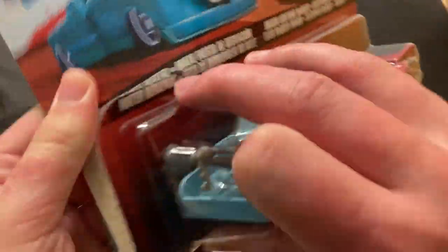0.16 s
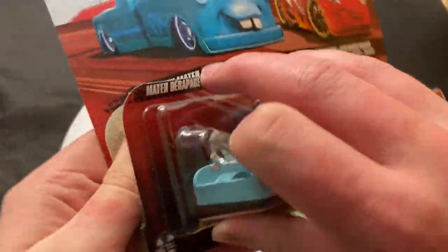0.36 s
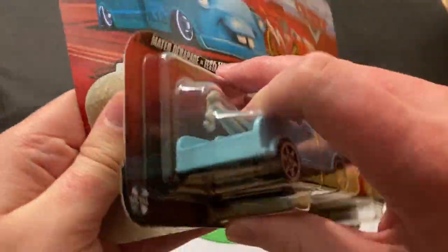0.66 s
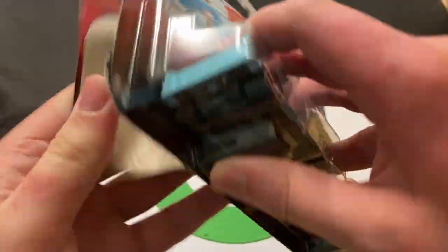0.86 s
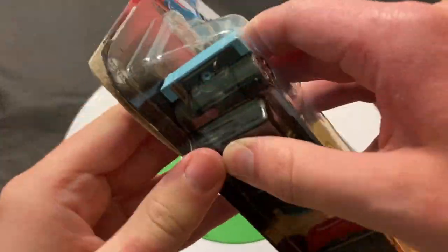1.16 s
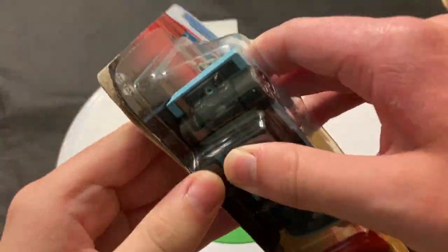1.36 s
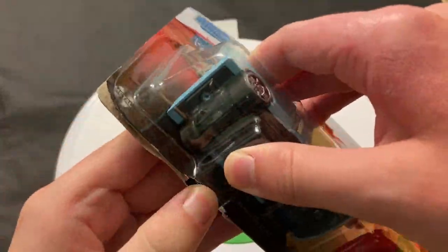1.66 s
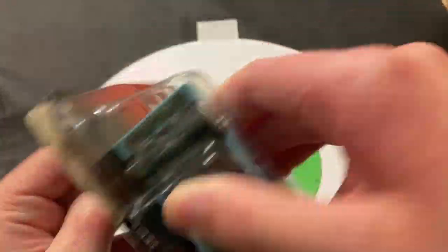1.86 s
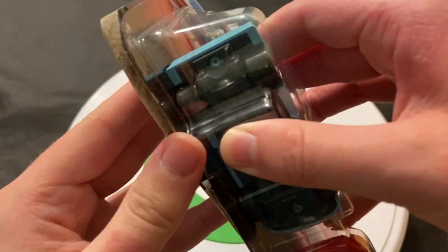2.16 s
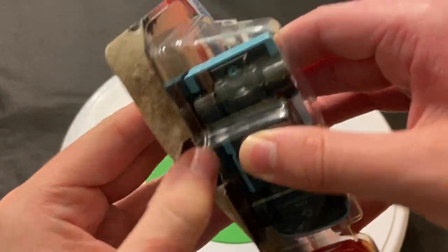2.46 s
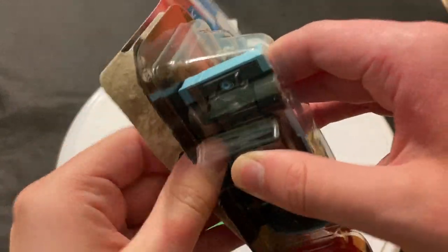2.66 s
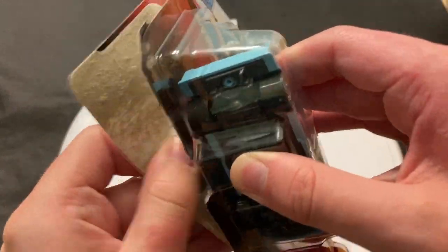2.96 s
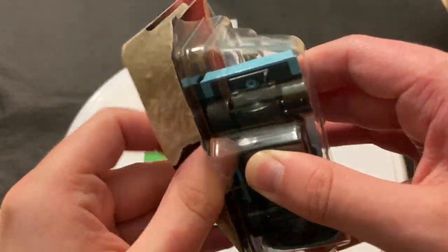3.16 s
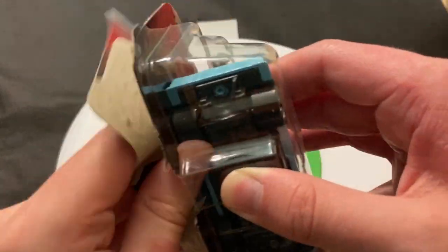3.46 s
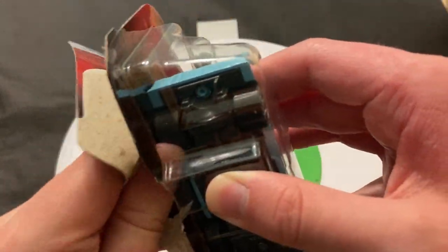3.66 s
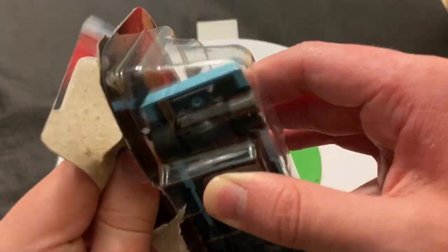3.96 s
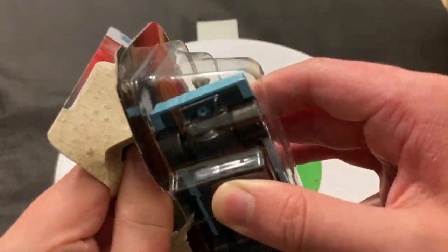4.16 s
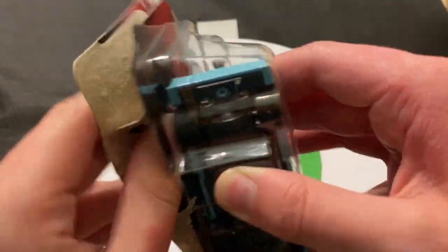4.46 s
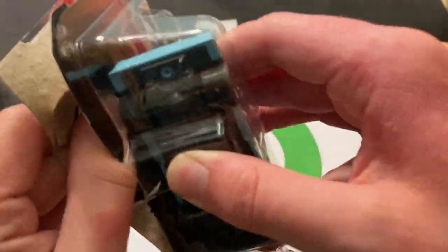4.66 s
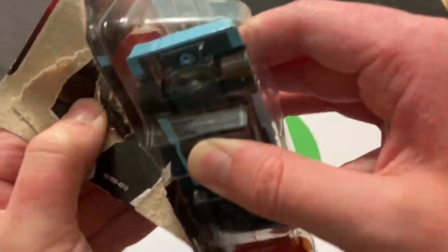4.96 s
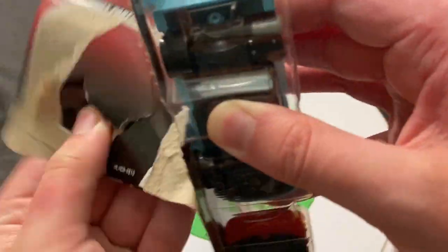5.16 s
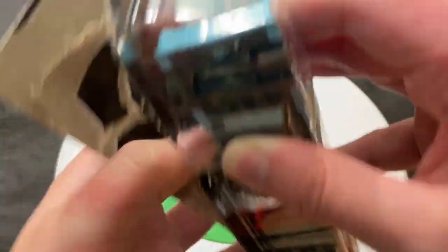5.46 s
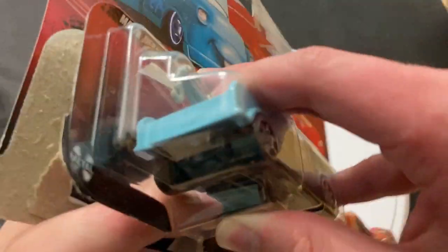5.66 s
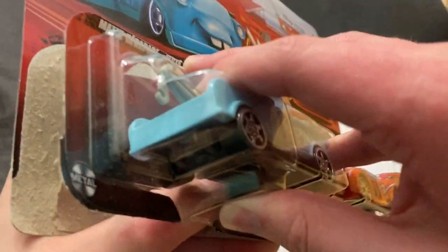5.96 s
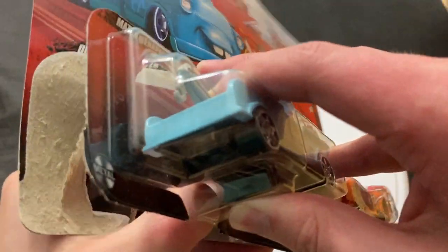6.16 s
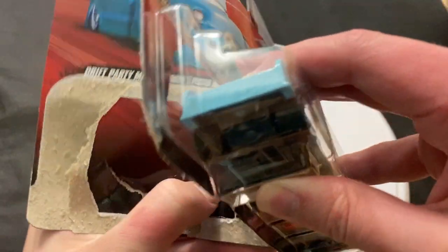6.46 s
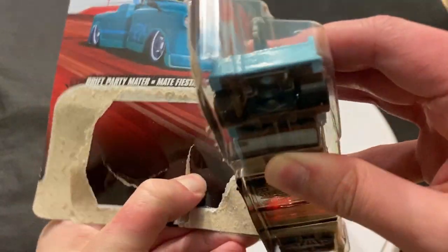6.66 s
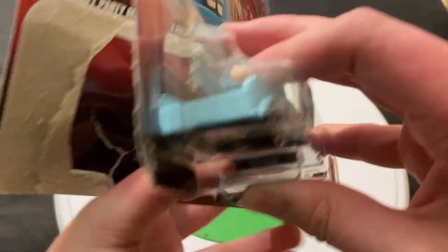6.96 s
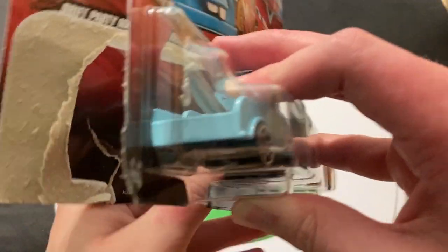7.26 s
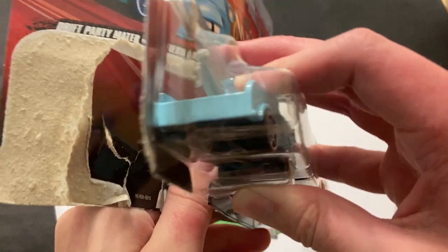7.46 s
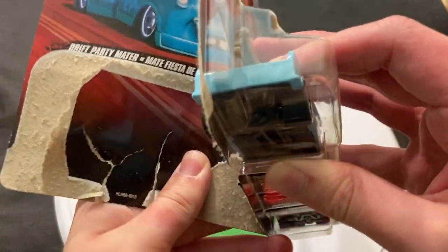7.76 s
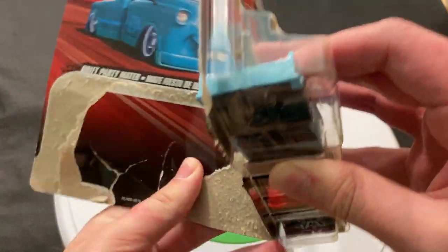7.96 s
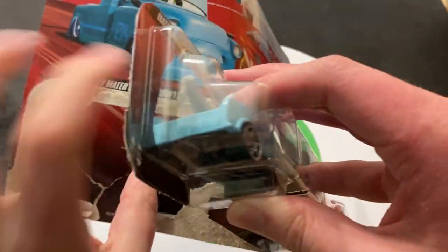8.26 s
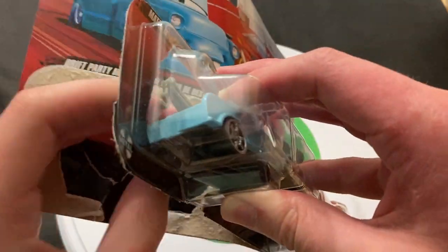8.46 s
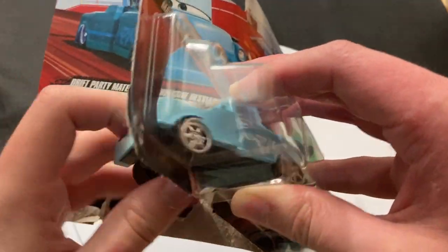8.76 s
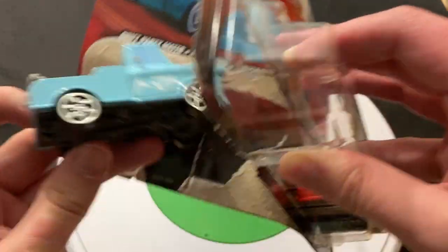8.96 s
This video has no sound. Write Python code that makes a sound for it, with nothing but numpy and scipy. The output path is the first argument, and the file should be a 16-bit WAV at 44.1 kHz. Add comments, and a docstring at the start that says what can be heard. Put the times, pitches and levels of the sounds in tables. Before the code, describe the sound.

Very close to the microphone in a small quiet room, hands open a toy car's blister pack. Thin plastic crackles and card rips in short uneven jerks, with brief creaks early on. Loud hollow pops burst out near two, four and five seconds. Afterwards the handling gets lighter, with scattered crackles, fibre ticks, soft thuds and finally the toy tapping inside the plastic.

```python
"""Hands tear the cardboard backing off a toy car's blister pack, close to the microphone in a small room.
Ripping fibres and sliding fingers are random grains that drive card, plastic and torn edge; the thin blister
crackles and snaps in noise bursts at the pitch of each crease, and three times it buckles with a sagging hollow pop.
The card thuds, the toy taps inside, the strained plastic creaks and gives narrow tones through decaying resonances.
A wavering low hum, a rumble and a faint hiss of filtered noise lie underneath."""
import sys
import numpy as np
from scipy import signal
from scipy.fft import rfft, irfft
from scipy.io import wavfile
from scipy.ndimage import uniform_filter1d

SR = 44100
rng = np.random.default_rng(int(sys.argv[2]) if len(sys.argv) > 2 else 0)


def put_to_file(sound):
    """Save the sound as 16-bit audio at rate SR, in the file named by the first command-line argument."""
    columns = np.atleast_2d(sound).T  # one column per channel
    safe = np.clip(columns, -1, 1)
    whole_steps = np.round(safe * 32767)
    wavfile.write(sys.argv[1], SR, whole_steps.astype(np.int16))


N = 400869
TIME = np.arange(N) / SR


def from_db(db):
    """Decibels to gain."""
    return np.exp(np.asarray(db) * (np.log(10) / 20))


def rms_one(x):
    """Scale to an rms of 1."""
    return x / np.sqrt(np.mean(x ** 2) + 1e-20)


def in_time(rows):
    """Each column of a curve, at every sample."""
    s, *columns = np.transpose(rows)
    return [np.interp(TIME, s, c) for c in columns]


def at_hz(points, hz):
    """Read a table on a log-frequency axis."""
    f, value = np.transpose(points)
    return np.interp(np.log(np.maximum(hz, 1)), np.log(f), value)


def butter(x, hz, kind, order=2):
    """Causal low-, high- or band-pass."""
    sos = signal.butter(order, np.clip(hz, 10, .45 * SR), kind, fs=SR, output="sos")
    return signal.sosfilt(sos, x)


def colour(x, spectrum):
    """Give a signal a spectrum through a causal (minimum-phase) filter; rms 1."""
    size = 8192
    log_gain = np.log(from_db(at_hz(spectrum, np.fft.rfftfreq(size, 1 / SR))))
    # folding the cepstrum onto positive times makes the filter minimum-phase
    cepstrum = irfft(log_gain)
    cepstrum[1:size // 2] *= 2
    cepstrum[size // 2 + 1:] = 0
    impulse = irfft(np.exp(rfft(cepstrum)))
    return rms_one(signal.fftconvolve(x, impulse)[:N])


def drift(rate):
    """Smooth chance with a spread near 1, taking a new value `rate` times a second."""
    values = rng.standard_normal(N // 40)
    return np.interp(TIME * rate, np.arange(len(values)), values)


def add(out, s, sound):
    """Mix a sound in at time s."""
    start = int(np.clip(round(s * SR), 0, N - 1))
    out[start:start + len(sound)] += sound[:N - start]


def ring(x, hz, t60):
    """A two-pole resonator: a unit click sets a decaying sine of height 1 ringing."""
    r, w = from_db(-60 / (t60 * SR)), 2 * np.pi * hz / SR
    return signal.lfilter([0, np.sin(w)], [1, -2 * r * np.cos(w), r * r], x + 1e-18)


def resonate(x, hz, width_hz):
    """One resonance, with a gain of 1 at its top."""
    r = np.exp(-np.pi * width_hz / SR)
    top = np.array([1, 0, -1]) * (1 - r * r) / 2
    return signal.lfilter(top, [1, -2 * r * np.cos(2 * np.pi * hz / SR), r * r], x + 1e-18)


def background(low_hz=60, high_hz=100):
    """A wavering hum and a low handling rumble that rises and falls, under a faint hiss."""
    # the quiet room's air: (frequency [Hz], relative level per Hz [dB])
    air = [(30, -51), (55, 0), (75, 0), (110, 0), (170, -9), (300, -17), (1500, -21), (4000, -34.5),
           (10000, -40), (16000, -46)]
    # low handling rumble: (time [s], level [dB])
    rumble_levels = [(0, -55), (1, -89.5), (5, -66), (6.7, -57), (8.4, -66)]
    # the hum swells for a moment: (time [s], added level [dB])
    hum_swell = [(7.6, -2), (7.85, 17), (8.2, 10), (8.4, 3)]
    hum_hz, hum_db, air_db = 75.6, -67.5, -58.5   # hum level before the swell
    hum_gain = from_db(hum_db + in_time(hum_swell)[0] + 2 * drift(5.0))
    hum = np.sqrt(2) * np.sin(2 * np.pi * hum_hz * TIME) * hum_gain
    low_noise = rms_one(butter(rng.standard_normal(N), [low_hz, high_hz], "band", order=4))
    rumble = from_db(in_time(rumble_levels)[0]) * low_noise
    hiss = from_db(air_db) * colour(rng.standard_normal(N), air)
    return hum + rumble + hiss


def narrow_tones(t60=0.019):
    """Fading noise keeps one mode of the wall sounding."""
    # narrow tones on the plastic: squeaks, and modes left ringing by a snap or pop:
    # (time [s], length [s], level [dB], pitch [Hz])
    tone_table = [(0.04, 0.095, -38.5, 2170), (3.74, 0.45, -56.5, 2560), (4.088, 0.068, -40.5, 4800),
                  (6.9626, 0.012, -30, 3600), (6.966, 0.0082, -30.5, 4870), (8.058, 0.036, -44.5, 895),
                  (8.285, .03, -51.5, 880), (8.913, 0.031, -41.5, 6560), (8.927, 0.097, -47, 3350),
                  (8.95, 0.038, -41, 4820)]
    out = np.zeros(N)
    for s, length, level_db, hz in tone_table:
        fade = np.sqrt(np.linspace(1, 0, int(length * SR)))
        mode = ring(rng.standard_normal(SR // 2)[:len(fade)], hz, t60)
        add(out, s, from_db(level_db) * rms_one(fade * mode))
    return out


def creaks(tick_db=-13, mode_spread_db=5.0, uneven_db=4):
    """The strained blister slips a notch at a time; each slip ticks and plucks the wall's modes."""
    # slips come evenly or, as the strain eases, further apart:
    # (start [s], length [s], first gap [s], growth of each gap [ratio])
    creak_table = [(1.105, .055, .022, 1.0), (1.325, .135, .0173, 1.165), (1.5524, .12, .022, 1.0)]
    # level of a creak's slips before chance lowers each one: (level [dB])
    creak_levels = [-45, -37, -38]
    # what a creak rings with once settled: (frequency [Hz], typical level [dB], t60 [s])
    creak_modes = [(572, -4, 0.047), (880, -6.5, 0.044), (1400, -9.5, 0.0092), (2960, -11.5, 0.00487)]
    # a slip's ring starts higher by this share and sinks as the wall relaxes
    glide, glide_s = 1.48, 0.00097
    out, t = np.zeros(N), TIME[:SR // 10]
    turns = 2 * np.pi * np.cumsum(1 + glide * np.exp(-t / glide_s)) / SR
    for (start, length, gap, growth), peak_db in zip(creak_table, creak_levels):
        delays = np.cumsum(np.r_[0, gap * growth ** np.arange(10)])
        for delay in delays[delays < length]:
            slip = np.zeros(len(t))
            for hz, level_db, t60 in creak_modes:
                mode_db = level_db + mode_spread_db * rng.standard_normal()
                slip += np.sin(hz * turns) * from_db(mode_db - 60 * t / t60)
            slip[0] += from_db(tick_db)
            add(out, start + delay, from_db(peak_db - uneven_db * rng.random()) * slip)
    return out


def taps(t60=0.023, upper_ratio=2.96, upper_db=-6, rattle=0.26, rattle_t60=0.023):
    """A tap rings one patch of wall and a weaker overtone, and rattles against it for a moment."""
    # the toy shifts and taps the blister: (time [s], peak level [dB], pitch of the patch [Hz])
    tap_table = [(3.385, -26, 1200), (6.247, -22, 1400), (8.351, -26, 1100), (8.372, -30.5, 1260),
                 (8.406, -29.5, 1330), (8.53, -22.5, 1520), (8.548, -23.5, 1400), (8.741, -21, 1280),
                 (8.864, -28, 1200)]
    out, t = np.zeros(N), TIME[:SR // 10]
    for (s, peak_db, hz), chatter in zip(tap_table, rng.standard_normal((len(tap_table), len(t)))):
        force = rattle * chatter * from_db(-60 * t / rattle_t60)
        force[0] = 1
        overtone = from_db(upper_db) * ring(force, upper_ratio * hz, t60 / 2)
        tap = ring(force, hz, t60) + overtone
        add(out, s, from_db(peak_db) * tap / np.abs(tap).max())
    return out


def thump(shake, crack=0.43, low_hz=150, high_hz=800, t60=0.045):
    """A jolt and a short shudder of the card; rms 1."""
    push = shake * from_db(-60 * TIME[:len(shake)] / t60)
    push[0] += 2 * crack
    return rms_one(butter(push, [low_hz, high_hz], "band"))


def thuds():
    """Low thuds: each jolt sets the card shuddering in a low band of noise."""
    # low thuds of the card, alone or under a strong snap or pop:
    # (time [s], level as energy spread over 5 ms [dB])
    thud_table = [(0.278, -45.5), (0.398, -37), (0.516, -45), (0.746, -32), (0.8706, -30), (1.8461, -13),
                  (2.021, -30.5), (2.099, -34), (2.708, -38.5), (2.8763, -29.5), (3.231, -33.5),
                  (4.047, -21.5), (5.305, -36.5), (5.5471, -43), (5.9962, -42), (6.197, -33), (6.8, -42),
                  (7.027, -33.5), (7.1301, -33.5), (7.518, -36), (8.8761, -31), (9.0756, -27.5)]
    out, size = np.zeros(N), SR // 6
    unit = np.sqrt(.005 * SR / size)   # rms over the burst to energy over 5 ms
    for (s, level_db), shake in zip(thud_table, rng.standard_normal((len(thud_table), size))):
        add(out, s, unit * from_db(level_db) * thump(shake))
    return out


def buckles(sag=0.12, settle_s=0.0035, rise_s=0.00047, thud_hz=225, thud_db=-17, thud_t60=0.021):
    """The flipped wall swings, its pitch sagging as the tension goes; the whole pack jolts."""
    # a wall of the blister flips over:
    # (time [s], level before the onset's rise [dB], middle of the sagging pitch [Hz], t60 [s])
    buckle_table = [(1.8466, 1, 916, 0.027), (4.033, -15, 880, 0.022), (4.0388, -10, 832, 0.048),
                    (4.9071, -2, 876, 0.042)]
    out, t = np.zeros(N), TIME[:SR // 4]
    for s, peak_db, hz, t60 in buckle_table:
        pitch = hz * (1 + sag * (np.exp(-t / settle_s) - .5))
        swing = np.sin(2 * np.pi * np.cumsum(pitch) / SR) * from_db(-60 * t / t60)
        jolt = np.sin(2 * np.pi * thud_hz * t) * from_db(thud_db - 60 * t / thud_t60)
        add(out, s, from_db(peak_db) * (swing + jolt) * (1 - np.exp(-t / rise_s)))
    return out


def wall_modes(force, hz, draws, spread=0.701, cycles=26):
    """The wall around a crease has a handful of modes scattered about its pitch, dying within some cycles."""
    pitches = np.minimum(hz * np.exp(spread * draws), 14000)
    total = np.zeros(len(force))
    for f, d in zip(pitches, draws):
        mode = rms_one(np.gradient(ring(force, f, cycles / f)))
        total += mode * np.exp(-d * d / 2)   # weaker away from the crease's pitch
    return rms_one(total)


def snaps(crack=2.84, width=1.345, swell=0.0052, top_hz=14000, hard_db=-16, hardness=0.032,
          modes_db=-2.0, split_db=-19, count=5):
    """A crease jumps with one sharp crack, flutters at its own pitch and shakes the card behind it."""
    # the blister snaps at a crease:
    # (time [s], level of the crease's sound as energy spread over 5 ms [dB], pitch [Hz], t60 of the flutter [s])
    snap_table = [(0.003, -25, 3320, 0.092), (0.214, -37.5, 930, 0.054), (0.4418, -33.5, 895, 0.062),
                  (0.62, -30, 5100, 0.068), (0.683, -29, 4500, .04), (0.7106, -28, 1340, 0.076),
                  (0.733, -24.5, 3350, 0.18), (0.747, -32, 1400, 0.027), (0.8715, -30.5, 1550, 0.012),
                  (0.923, -11.5, 4560, 0.0096), (0.9394, -17, 2600, 0.02), (1.8076, -14, 3940, 0.012),
                  (1.8339, -17.5, 5800, 0.034), (1.8347, -18, 1500, 0.078), (1.8462, -16, 1870, 0.021),
                  (2.023, -28, 1060, 0.046), (2.099, -34, 4830, 0.014), (2.582, -30.5, 3050, 0.11),
                  (2.586, -34, 1260, 0.097), (2.707, -27, 1500, 0.028), (2.7716, -33, 1340, 0.053),
                  (2.877, -38, 940, 0.039), (2.949, -18.5, 4280, 0.014), (3.071, -18.5, 3260, 0.024),
                  (3.2075, -24, 1610, 0.018), (3.2315, -36, 2130, 0.056), (3.3346, -30.5, 906, 0.074),
                  (3.375, -33.5, 1170, 0.034), (3.5794, -19, 5700, 0.011), (3.87, -21, 5000, 0.012),
                  (4.038, -8, 1100, 0.1), (4.038, -11.5, 4160, 0.11), (4.0559, -19, 1680, 0.013),
                  (4.2533, -30.5, 5360, 0.038), (4.397, -26.5, 1100, 0.018), (4.847, -28.5, 5100, 0.02),
                  (4.907, -10, 1280, 0.026), (4.9138, -19.5, 4130, 0.035), (4.9376, -20, 1890, 0.14),
                  (4.953, -14, 1290, 0.066), (4.9783, -22.5, 2220, 0.027), (5.5475, -20, 1450, 0.024),
                  (5.612, -31.5, 1120, 0.016), (5.651, -33.5, 4380, 0.012), (5.7498, -30, 2770, 0.02),
                  (5.761, -33, 4530, 0.036), (5.809, -27.5, 2300, 0.01), (5.9942, -31, 953, 0.041),
                  (6.223, -29, 4030, 0.041), (6.2424, -27.5, 1330, 0.029), (6.9656, -30, 3660, 0.037),
                  (7.003, -27, 1800, 0.065), (7.016, -32, 1970, 0.02), (7.026, -30, 900, 0.054),
                  (7.1282, -23, 1410, 0.093), (7.2289, -24.5, 1610, 0.02), (7.303, -29, 2240, 0.019),
                  (7.352, -30, 3060, 0.042), (7.3591, -22, 1460, 0.013), (7.518, -30, 1920, 0.023),
                  (7.5381, -28, 4440, 0.004), (7.9985, -33.5, 2320, 0.011), (8.4324, -31.5, 2970, 0.017),
                  (8.5282, -30.5, 3550, 0.077), (8.7407, -32, 1890, 0.03), (8.8754, -26.5, 1000, 0.13),
                  (9.0768, -22.5, 2550, 0.031)]
    # a snap shakes the card, less so from a small, high crease
    thump_db, thump_db_per_octave, thump_at_hz = -22, -2.5, 1500
    out, t = np.zeros(N), TIME[:SR // 6]
    unit = np.sqrt(.005 * SR / len(t))   # rms over the burst to energy over 5 ms
    scatter = np.linspace(-1, 1, count) + rng.uniform(-0.94, 1, (len(snap_table), count)) / count
    noises = rng.standard_normal((len(snap_table), 2, len(t)))
    band = max(width, 1.1)
    for (s, snap_db, hz, t60), draws, (flutter, shake) in zip(snap_table, scatter, noises):
        # a long crumple takes longer to get going than a short snap
        force = flutter * from_db(-60 * t / t60) * (1 - np.exp(-t / (swell * t60)))
        force[0] += 2 * crack
        crease = butter(force, [hz / band, hz * band], "band", order=1)
        crease = butter(crease, hz / 2.34, "high")
        # harder snaps reach further into the treble
        reach_hz = top_hz * from_db(hardness * min(snap_db - hard_db, 0))
        crease = butter(crease, max(reach_hz, 2 * hz), "low")
        crease = rms_one(crease) + from_db(modes_db) * wall_modes(force, hz, draws)
        # the first instant is bright at any pitch
        crease += from_db(split_db) * rms_one(butter(force, top_hz / 2, "high"))
        card_db = thump_db + thump_db_per_octave * np.log2(hz / thump_at_hz)
        card = from_db(card_db) * thump(shake)
        add(out, s, unit * from_db(snap_db) * (rms_one(crease) + card))
    return out


def ticks(rub_gain, low_hz=1800, high_hz=9000, t60=0.012, crack=0.85, spread_db=4):
    """Dry, wide ticks with hardly any ring: a few clear ones and a scatter that follows the rubbing."""
    # a single strand or spot of glue lets go: (time [s], level as energy spread over 5 ms [dB])
    tick_table = [(0.59, -39), (1.325, -45), (1.619, -41.5), (2.221, -53.5), (2.814, -32), (2.962, -29),
                  (3.292, -33), (3.423, -42), (3.763, -36.5), (4.019, -39), (5.375, -38.5), (6.016, -43),
                  (6.032, -41), (6.1163, -37), (6.353, -35), (6.461, -39), (6.644, -41), (6.689, -43)]
    strays_per_s, stray_db = 30, 0   # lesser ticks come by chance, level relative to the rubbing
    out, t = np.zeros(N), TIME[:SR // 50]
    strays = []
    for i in np.flatnonzero(rng.random(N) < strays_per_s / SR):
        chance_db = spread_db * np.clip(rng.standard_normal(), -2, 1)
        strays.append((i / SR, 20 * np.log10(rub_gain[i]) + stray_db + chance_db))
    for s, level_db in tick_table + strays:
        force = rng.standard_normal(len(t)) * from_db(-60 * t / t60)
        force[0] += 2 * crack
        tick = rms_one(butter(butter(force, low_hz, "high"), high_hz, "low"))
        add(out, s, .5 * from_db(level_db) * tick)   # half: rms over 20 ms to energy over 5 ms
    return out


def blocks(x):
    """Cut the rubbing into even 0.12 s blocks, each with time to ring out: (s, sound)."""
    size = int(.12 * SR)
    return [(i / SR, np.pad(x[i:i + size], (0, size // 3))) for i in range(0, N, size)]


def grains(spread_db, per_s):
    """Tiny breaks and slips at random moments: many small ones, a few large; even mean power."""
    sizes = from_db(spread_db * np.minimum(rng.exponential(1, N), 5.5))
    clicks = sizes * rng.choice([-1, 1], N) * (rng.random(N) < per_s / SR)
    power = np.maximum(uniform_filter1d(clicks ** 2, size=1500), 0)
    return clicks / np.sqrt(power + 1e-6)


def facets(clicks, patchy_db=5.0, cycles=18, count=24):
    """Each grain rings a small facet of its own size; pitches are drawn afresh in each block; rms 1."""
    out = np.zeros(N)
    for s, block in blocks(clicks):
        # facets spread at random from 800 to 14000 Hz
        pitches = 800 * (14000 / 800) ** ((np.arange(count) + rng.random(count)) / count)
        gains = from_db(patchy_db * np.minimum(rng.standard_normal(count), 1))
        dealt = rng.integers(0, count, len(block))   # which facet each grain strikes
        for k, hz in enumerate(pitches):
            add(out, s, gains[k] * ring(block * (dealt == k), hz, cycles / hz))
    return rms_one(np.diff(out, prepend=0))


def flap(rub, ring_db=-3, quality=0.84):
    """The free flap gives the rubbing a broad resonance that moves as the tear goes on; rms 1."""
    # the loose flap's pitch, set by how much of it is free: (time [s], pitch [Hz])
    flap_pitch = [(0, 2660), (.7, 2350), (2.0, 1100), (3.0, 2820), (4.4, 1400), (5.1, 1166), (7.7, 1780),
                  (8.4, 1400), (8.95, 2030)]
    out = np.zeros(N)
    for s, block in blocks(rub):
        hz = np.interp(s, *np.transpose(flap_pitch))
        add(out, s, resonate(block, hz, hz / quality))
    return rms_one(rub + from_db(ring_db) * out)


def free_walls(x, ring_db=-4, width_hz=110, patchy_db=5.0, count=14):
    """Rubbing sets narrow modes of the plastic singing; pitches are drawn afresh in each block."""
    out = np.zeros(N)
    for s, block in blocks(x):
        # modes spread at random from 1150 to 7500 Hz
        pitches = 1150 * (7500 / 1150) ** ((np.arange(count) + rng.random(count)) / count)
        gains = from_db(ring_db + patchy_db * np.minimum(rng.standard_normal(count), 2))
        for hz, gain in zip(pitches, gains):
            add(out, s, gain * resonate(block, hz, width_hz))
    return (x + out) / np.sqrt(1 + from_db(ring_db))


def envelope(length, attack_s, release_db_per_s):
    """Quick attack, hold, then an even fall in dB."""
    t = TIME[:SR // 2]
    return np.clip(t / attack_s, 0, 1) * from_db(-release_db_per_s * np.maximum(t - length, 0))


def jerks(size, per_s=110, fade_s=0.0044, depth=0.45):
    """A rip advances in uneven jerks: fibres give in a bundle, then fade until the next; mean power 1."""
    starts = np.cumsum(rng.uniform(.3, 1.7, size // 100)) / per_s
    t = TIME[:size]
    last = np.searchsorted(starts, t)   # the latest jerk at each sample
    since = t - np.r_[0, starts][last]
    power = rng.uniform(0.62, 1.6, len(starts) + 1)[last] * np.exp(-since / fade_s)
    share = np.clip(depth, 0, 1)
    return np.sqrt(1 - share + share * power / power.mean())


def effort():
    """Gains of rubbing, fibre crackle and card flexing: a rip builds until the card gives, a slide holds."""
    # the card rips: (start [s], length [s], level of the rubbing once the pull has built up [dB],
    # fibre crackle relative to it [dB], card flexing relative to it [dB])
    rip_table = [(0.59, 0.19, -31.5, -1.5, -8), (1.677, 0.068, -52, 9, -10),
                 (1.812, 0.022, -42.5, 10.5, -2), (1.987, 0.06, -38, -1.5, -6.5),
                 (2.308, 0.056, -55, 4, -17), (3.016, 0.04, -28.5, 2.5, -8),
                 (4.402, 0.045, -36.5, 2.5, -10), (4.52, 0.046, -38.5, 2, -7.5), (4.924, 0.039, -32, 8, -2),
                 (5.05, 0.053, -27.5, 1.5, -10), (5.963, 0.057, -49, 12, -16),
                 (6.194, 0.046, -42.5, 7.5, -23), (6.52, 0.081, -37.5, 2.5, -5.5),
                 (7.529, 0.23, -43, 6.5, -7.5), (7.815, 0.062, -39.5, 5.5, -6),
                 (8.389, 0.057, -43, 0.5, -7)]
    # fingers and loose card slide over the pack: (start [s], length [s], level of the rubbing [dB],
    # fibre crackle relative to it [dB], card flexing relative to it [dB])
    slide_table = [(0, 0.0021, -21.5, -2.5, -16), (0.021, 0.04, -35, 2.5, -19),
                   (0.07, 0.034, -38, 1.5, -15), (0.239, 0.036, -52.5, 7.5, -1.5),
                   (.32, 0.086, -53.5, 4.5, -1.5), (.88, 0.13, -43.5, -1.5, -6.5),
                   (2.05, 0.047, -48, 3, -19), (2.947, 0.09, -45.5, 10, -20),
                   (3.221, 0.091, -41.5, -3.5, -5.5), (3.402, 0.026, -38, -11, -6),
                   (3.55, 0.063, -55, 12.5, -20), (3.709, 0.1, -56.5, 11.5, -32),
                   (3.875, 0.11, -48.5, 5, -22), (4.35, 0.071, -56, -18, 8), (4.656, 0.11, -51, 10.5, -14),
                   (4.792, 0.098, -39, 5, -11), (5.13, 0.057, -48, 3, -6), (5.272, 0.047, -44.5, 1, -9),
                   (5.34, 0.42, -50.5, 0.5, -6), (5.79, 0.18, -51, 2.5, -3.5), (6.32, 0.056, -45, 9.5, -6),
                   (6.41, 0.23, -49.5, 9, -13), (6.823, 0.029, -42.5, -1, -8),
                   (6.87, 0.17, -48.5, -2.5, -6.5), (7.43, 0.018, -45, -5, -19),
                   (8.326, 0.018, -39.5, -5.5, -7.5), (8.904, 0.042, -41.5, -2.5, -11),
                   (8.47, .11, -49, -7, -16), (8.645, 0.028, -40, -4, -7.5), (8.96, 0.14, -47.5, -9, -15)]
    # faint rustle of the pack shifting in the hands: (time [s], level [dB])
    hold = [(0, -80), (.2, -64), (.3, -57), (1.0, -57), (1.12, -76.5), (1.33, -65.5), (1.5, -76),
            (1.62, -67.5), (1.95, -59), (2.28, -83), (2.43, -78), (2.5, -67.5), (2.7, -52), (3.15, -59.5),
            (4.2, -56), (5.2, -58), (8.09, -53.5), (8.14, -72), (8.3, -68), (8.4, -56.5), (9.09, -55.5)]
    hold_fibre_db, hold_flex_db = 3.5, -4.5   # relative to the rustle
    build_db, peak_share = 9.5, 0.59   # the pull grows by this much, over this share of the rip
    hold_parts_db = np.array([[0], [hold_fibre_db], [hold_flex_db]])
    powers = from_db(in_time(hold)[0] + hold_parts_db) ** 2
    shapes = []
    for _, length, *_ in rip_table:
        pull = from_db(build_db * np.minimum(TIME[:SR // 2] / (peak_share * length) - 1, 0))
        shapes.append(envelope(length, attack_s=0.0061, release_db_per_s=384) * jerks(SR // 2) * pull)
    for _, length, *_ in slide_table:
        shapes.append(envelope(length, attack_s=0.0043, release_db_per_s=385))
    for (start, _, level_db, fibre_db, flex_db), shape in zip(rip_table + slide_table, shapes):
        for power, part_db in zip(powers, (0, fibre_db, flex_db)):
            add(power, start, (from_db(level_db + part_db) * shape) ** 2)
    return np.sqrt(powers)


def strokes(grains_per_s=5000, facet_share=1.41, facet_unevenness=0.72, clump_db=2.5, clumps_per_s=260,
            catch_db=1.45, catches_per_s=45, friction=0.59, slide_hz=7000, slide_db=-10):
    """Fibres let go in clumps, driving card, surface and torn edge; sliding skin adds a smooth high hiss."""
    # how unevenly the fibres give way, low when fingers only slide: (time [s], spread of grain sizes [dB])
    grain_spread = [(0, -2), (.75, 5), (1.1, 1), (3.05, 3.5), (3.8, 7), (4.85, 5), (5.1, 2.5), (6.3, 3.5),
                    (7.7, 0), (9.0, 5.5)]
    # colour of the flexing card: (frequency [Hz], relative level per Hz [dB])
    flex_colour = [(70, -26), (150, -5.5), (550, -0.5), (850, -6), (1500, -48.5)]
    # colour of the rubbed surface ahead of the flap: (frequency [Hz], relative level per Hz [dB])
    rub_colour = [(350, -28.5), (600, 4.5), (850, 4), (1400, -4), (2700, -6.5), (3600, -7), (6000, -38.5)]
    # colour of the fibres at the torn edge: (frequency [Hz], relative level per Hz [dB])
    fibre_colour = [(1500, -53), (2500, -12.5), (3400, -13.5), (4500, -2), (8000, -4.5), (11000, -5),
                    (14000, -9), (16000, -22)]
    rub_gain, fibre_gain, flex_gain = effort()
    spread_db, = in_time(grain_spread)
    clumps = from_db(clump_db * drift(clumps_per_s) + catch_db * drift(catches_per_s))
    pull = clumps * (grains(spread_db, grains_per_s) + friction * rng.standard_normal(N))
    facet_grains = grains(facet_unevenness * spread_db, 2 * grains_per_s)
    force = pull + clumps * facet_share * facets(facet_grains)
    skin = butter(colour(rng.standard_normal(N), fibre_colour), slide_hz, "high")
    slide = from_db(slide_db) * rms_one(skin)
    flex = flex_gain * colour(pull, flex_colour)
    rub = rub_gain * flap(colour(force, rub_colour))
    fibre = fibre_gain * rms_one(colour(force, fibre_colour) + slide)
    return flex + rub + fibre + ticks(rub_gain)


def shell(x, ring_db=-7):
    """Snaps, thuds and rubbing set the pack's hollow ringing."""
    # hollow of the blister and its card: (frequency [Hz], level relative to the other modes [dB], t60 [s])
    shell_modes = [(344.2, 5, 0.12), (690.4, 7.5, 0.12), (884, -2, 0.036), (1100, -6.5, 0.1),
                   (1450, -3.5, 0.034), (2680, -2.5, 0.3), (4080, -8, 0.017)]
    out = np.zeros(N)
    for hz, level_db, t60 in shell_modes:
        r, w = from_db(-60 / (t60 * SR)), 2 * np.pi * hz / SR
        top = np.array([1, 0, -1]) * (1 - r * r) / 2
        mode = signal.lfilter(top, [1, -2 * r * np.cos(w), r * r], x + 1e-18)
        out += from_db(level_db) * mode
    return x + from_db(ring_db) * out


def room(x, wet_db=-16.0, first_wall_s=0.00038):
    """A diffuse tail builds up until the first wall's delay and dies at its own pace in each band."""
    # the small room's ring: (frequency [Hz], t60 [s])
    room_t60 = [(300, 0.22), (1400, 0.22), (4000, 0.24), (12000, 0.077)]
    t, edges = TIME[:SR // 2], np.geomspace(100, 16000, num=8)
    tail = np.zeros(len(t))
    for low, high in zip(edges, edges[1:]):
        t60 = at_hz(room_t60, np.sqrt(low * high))
        tail += butter(rng.standard_normal(len(t)), [low, high], "band") * from_db(-60 * t / t60)
    tail = tail * np.minimum(t / first_wall_s, 1) ** 2
    return x + from_db(wet_db) * signal.fftconvolve(x, tail / np.linalg.norm(tail))[:N]


def microphone(x, air_hz=12000, air_db=-8):
    """The microphone lifts the very top a little."""
    return x + from_db(air_db) * butter(x, air_hz, "high", order=1)


def scene():
    """The pack in the hands, in the room."""
    shaken = snaps() + thuds() + free_walls(strokes())
    pack = shell(shaken) + buckles() + taps() + creaks() + narrow_tones()
    return (room(pack) + background())[None]


def record(dry, ceiling=0.46, low_cut_hz=42, cutoff_hz=16200):
    """The loudest pops are rounded off, the deepest bass is lost, the top is cut."""
    picked_up = microphone(dry)
    rounded = picked_up / (1 + (picked_up / ceiling) ** 4) ** (1 / 4)
    heard = butter(rounded, low_cut_hz, "high", order=3)
    top_cut = signal.ellip(10, .1, 80, cutoff_hz, fs=SR, output="sos")
    return signal.sosfilt(top_cut, heard)


dry = scene()
out = record(dry)
put_to_file(out)
```